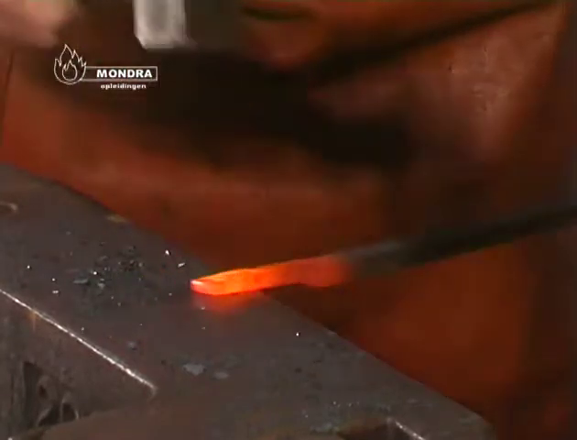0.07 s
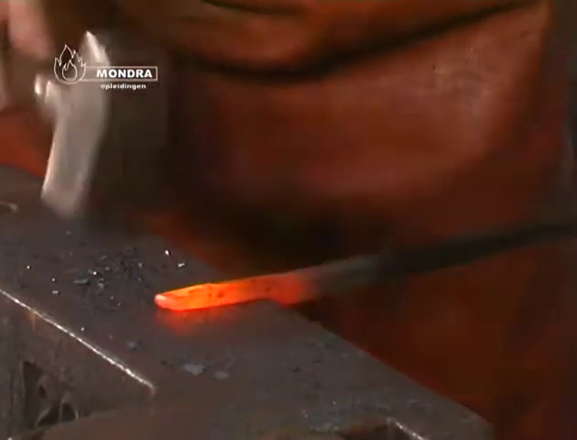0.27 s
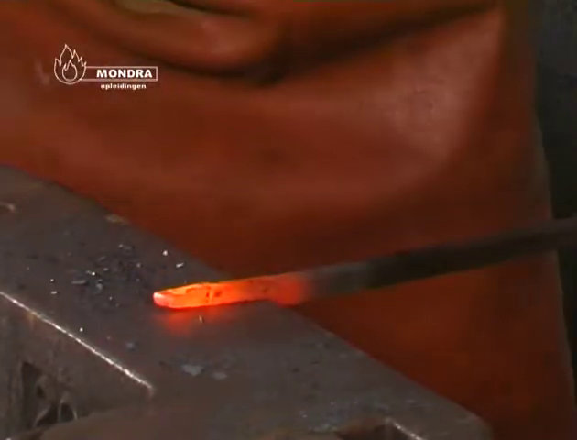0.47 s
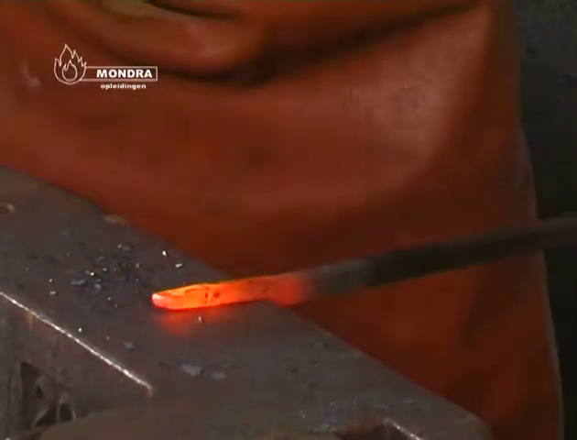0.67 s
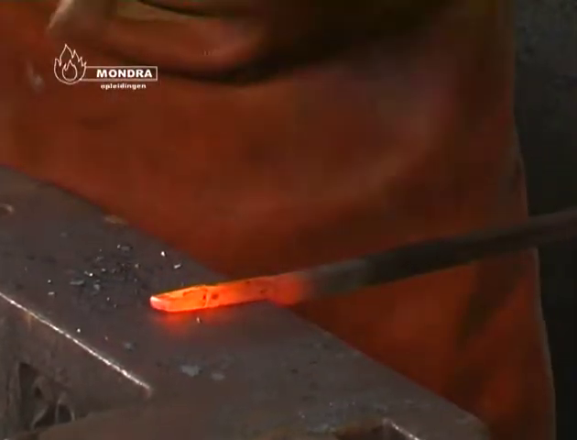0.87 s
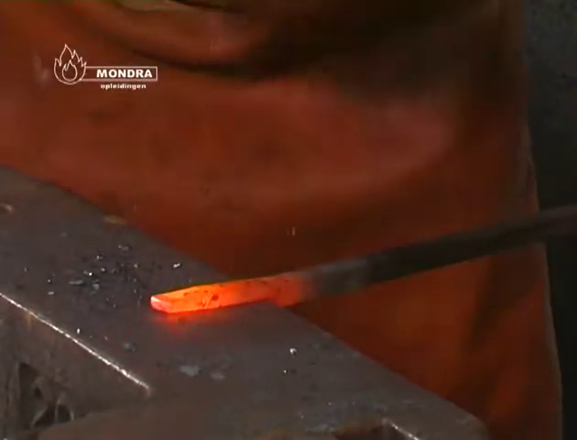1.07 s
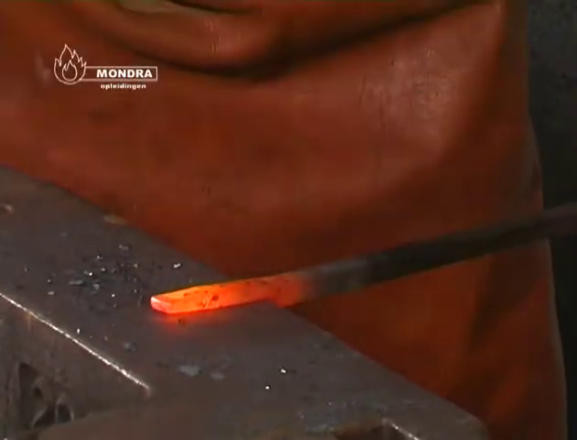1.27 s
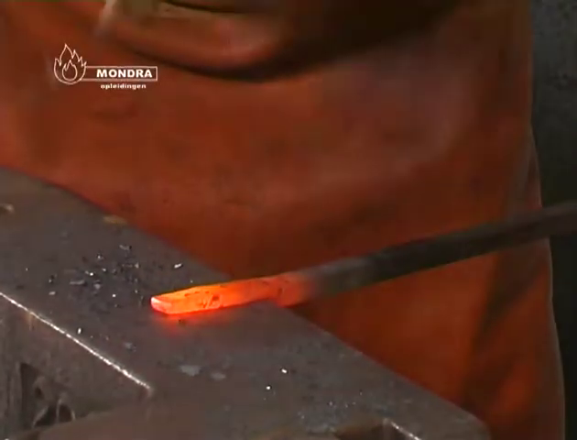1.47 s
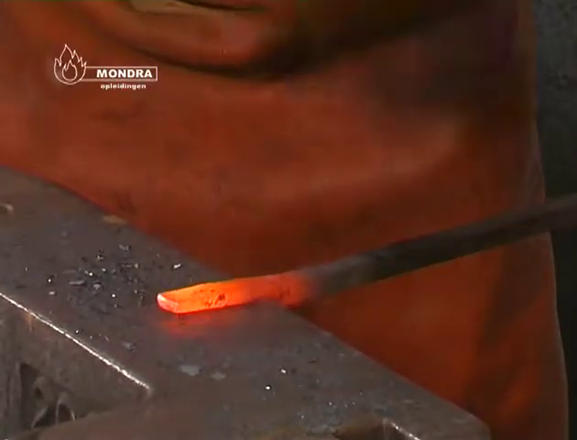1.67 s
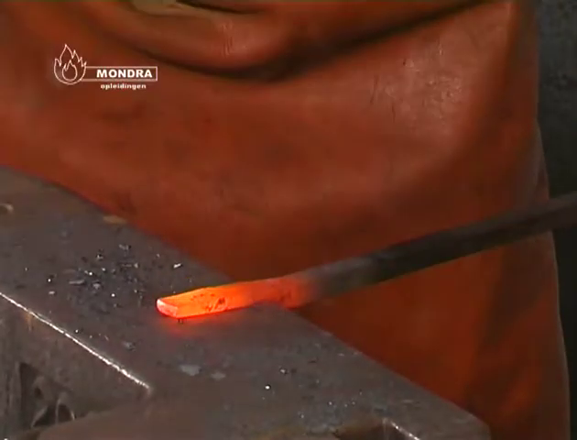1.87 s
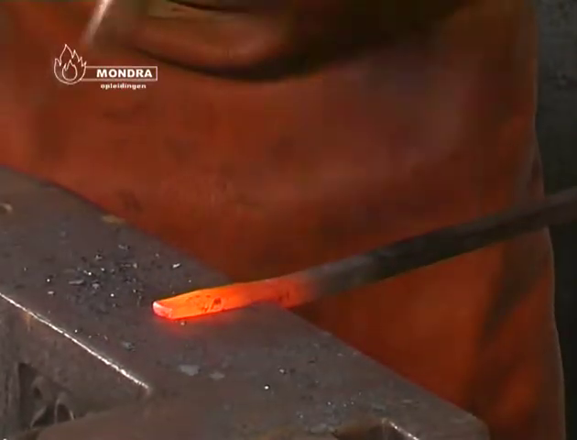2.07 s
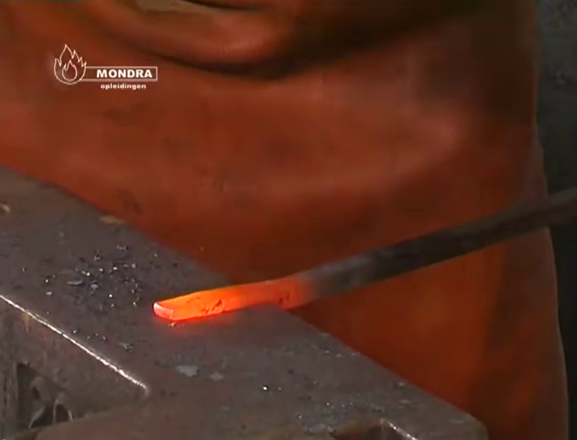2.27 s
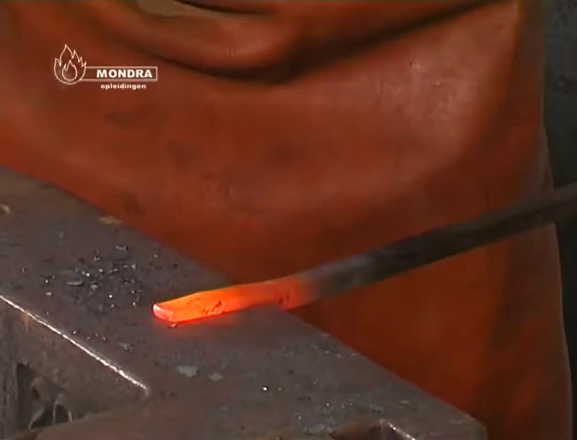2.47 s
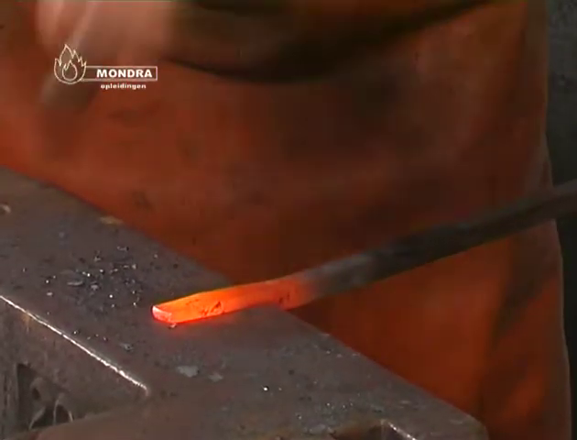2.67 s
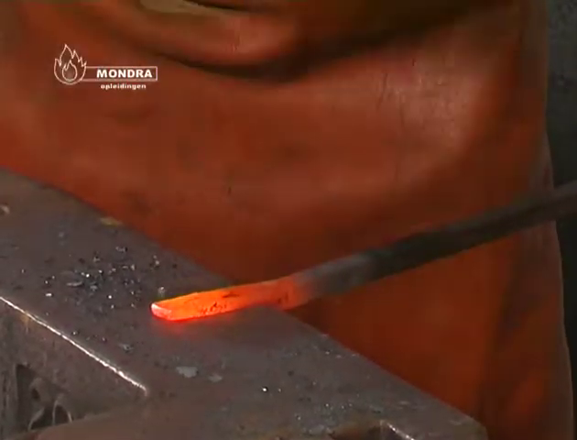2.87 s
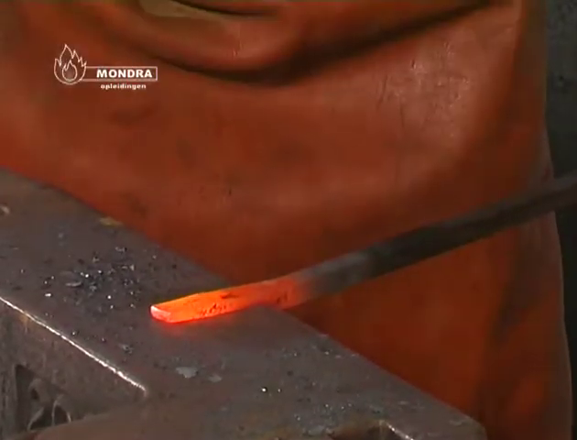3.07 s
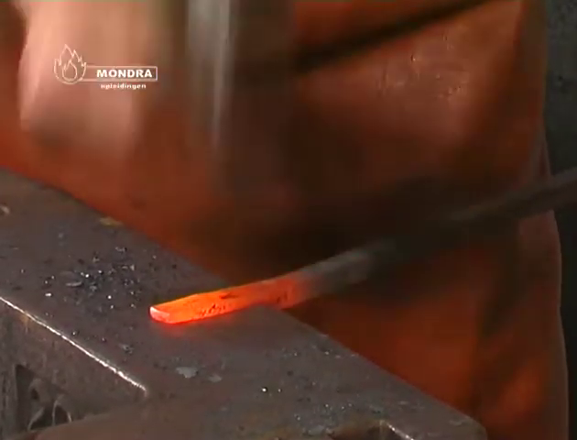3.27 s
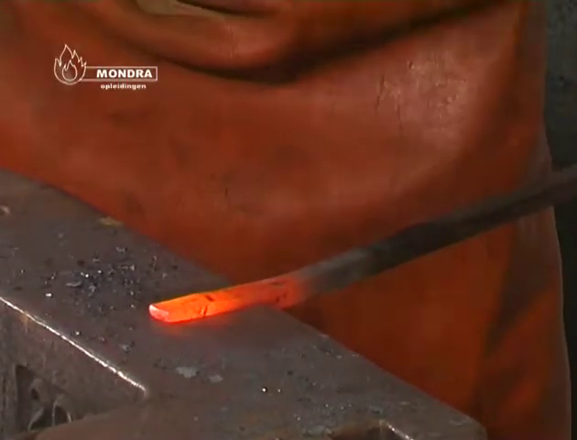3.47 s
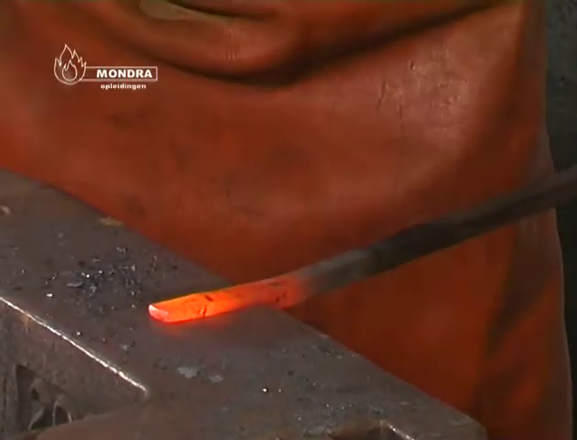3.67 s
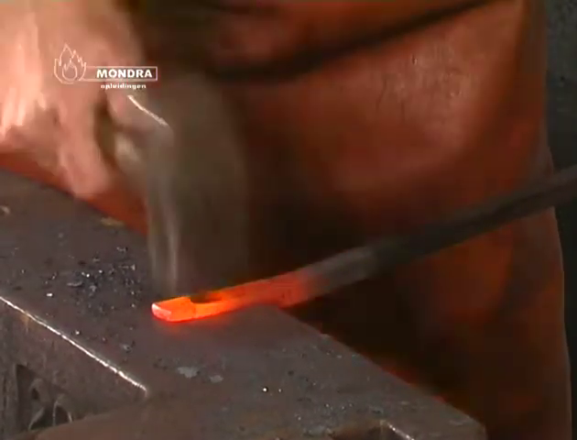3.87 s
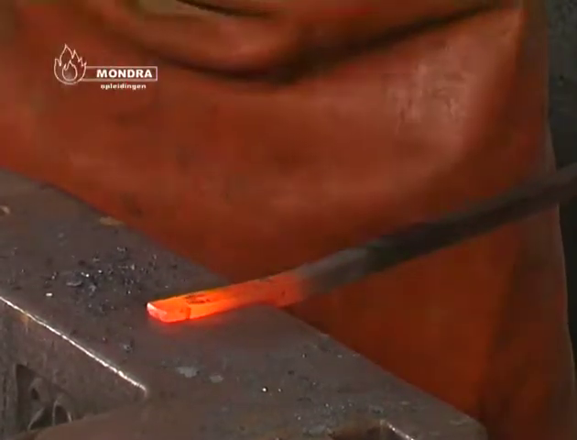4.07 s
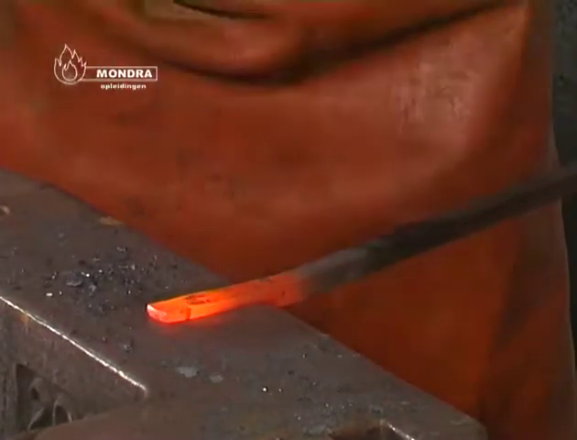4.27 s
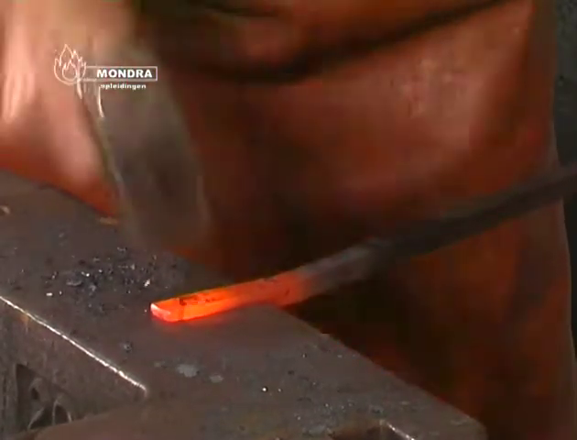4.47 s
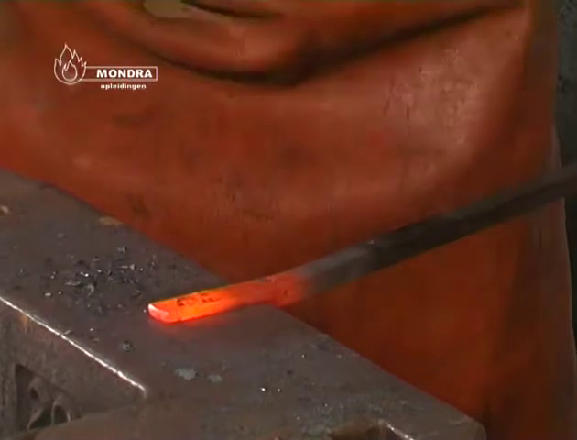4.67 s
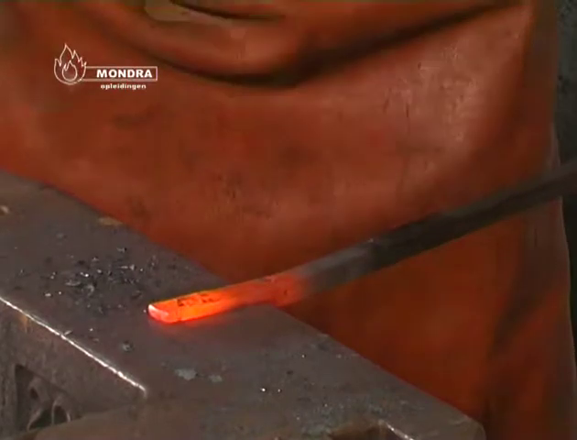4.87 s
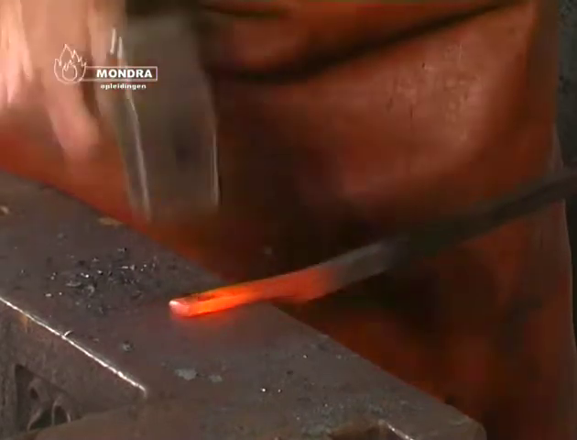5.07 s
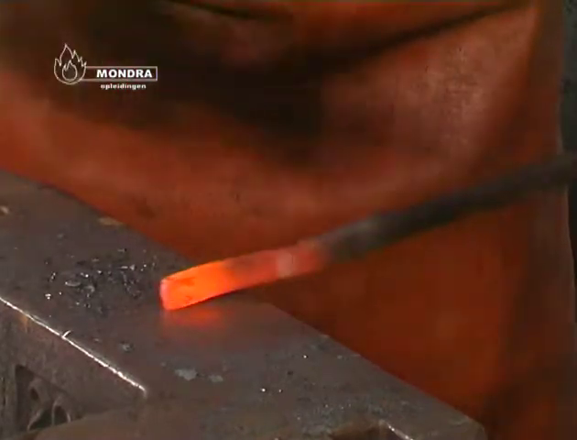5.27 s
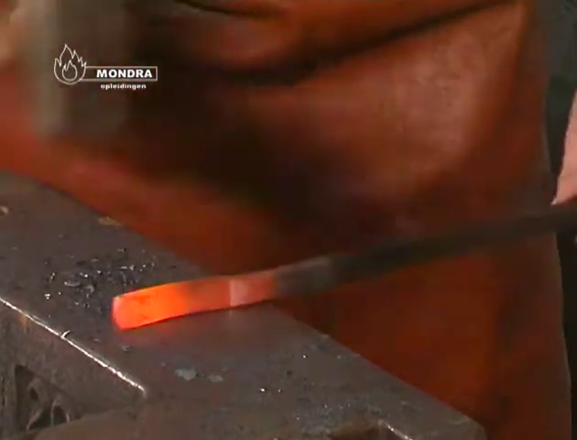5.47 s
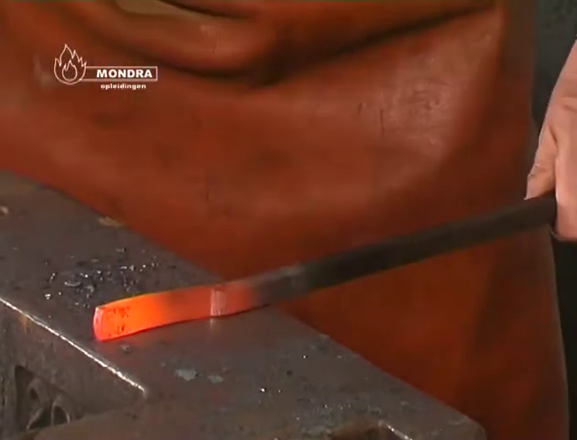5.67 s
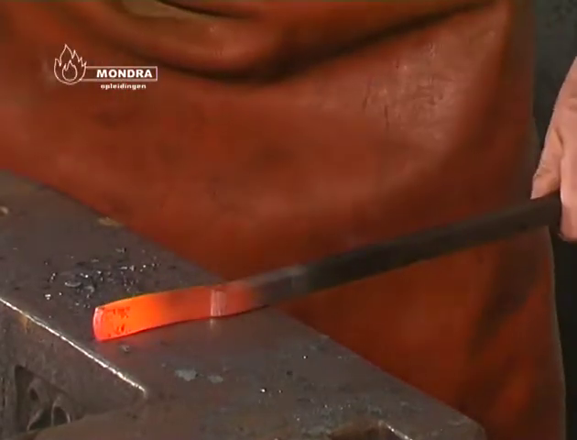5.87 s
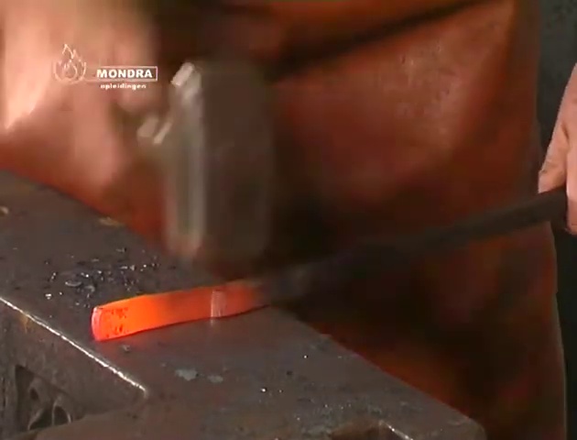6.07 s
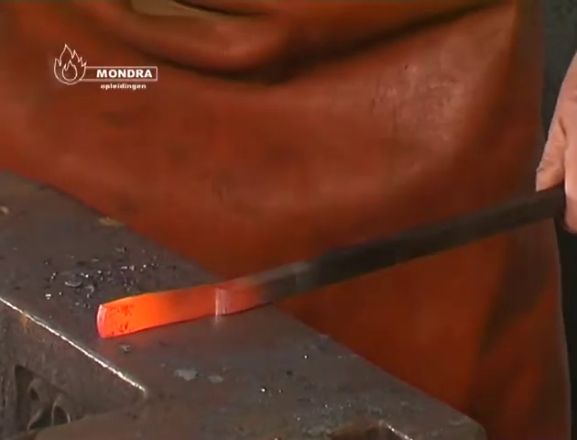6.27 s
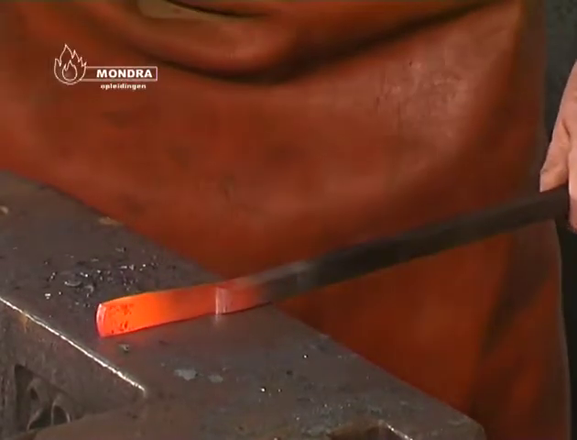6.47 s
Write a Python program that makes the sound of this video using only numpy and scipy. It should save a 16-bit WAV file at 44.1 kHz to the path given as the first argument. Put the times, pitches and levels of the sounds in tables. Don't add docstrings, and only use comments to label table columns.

```python
import sys
import numpy as np
from scipy import signal
from scipy.io import wavfile

SR = 44100
rng = np.random.default_rng(int(sys.argv[2]) if len(sys.argv) > 2 else 0)


def transcribe(signal):
    frames = np.atleast_2d(signal).T
    limited = np.clip(frames, -1, 1)
    pcm = np.round(limited * 32767).astype(np.int16)
    wavfile.write(sys.argv[1], SR, pcm)


def invert_db(x):
    u = np.asarray(x, float) / 20
    return 10 ** u


N = 287071
RUN_IN = SR // 2

# (t/s, crack level/dB, ring level/dB, place along the face [-1..1], place across [-1..1])
BLOWS = [
    (-.245, -15.5, -0.5, -1.15, -1.4),
    (0.9303, -12.5, 0, -0.34, 0.33),
    (1.5350, -14.5, -2.5, -0.37, -0.33),
    (2.1320, -13, -3, -0.27, 0.3),
    (2.7138, -13.5, -0.5, 0.38, 0.03),
    (3.293, -13.5, -1, 0.67, 0.25),
    (3.8630, -15, -1.5, 0.31, -0.44),
    (4.435, -15.5, -2.5, 0.4, -0.58),
    (5.0150, -14.5, -1.5, 0.84, -0.44),
    (6.0377, -20, -12, -0.95, -1.1),
]
# (t/s, crack level/dB, brightness/dB, heft/dB, body tone level/dB)
TAPS = [
    (0.2631, -15, -3.5, -1, -11.5),
    (5.404, -19, -31, -5, -21),
]


def at_hz(points, hz):
    table = np.array(points)
    return np.interp(np.log(hz), np.log(table[:, 0]), table[:, 1])


def by_place(per_unit_db):
    return np.clip(np.array(BLOWS)[:, 3:], -1, 1) @ per_unit_db


def clicks(times, db):
    out = np.full(N + RUN_IN, 1e-18)
    out[np.round(np.asarray(times) * SR).astype(int) + RUN_IN] = invert_db(db)
    return out


def ring(x, hz, t60):
    r = invert_db(-60 / (t60 * SR))
    w = 2 * np.pi * hz / SR
    return signal.lfilter([0, np.sin(w)], [1, -2 * r * np.cos(w), r * r], x)


def convolve(x, response):
    return signal.fftconvolve(x[None], response, axes=1)[:, :N + RUN_IN]


def stereo_bands(white, shape):
    # (f/Hz, likeness [0..1])
    likeness = [(80, 0.88), (160, 1), (350, 0.26), (700, 0.015), (1400, 0.58), (2800, 0.23), (5600, 0.58),
                (11000, 0.32)]
    # (f/Hz, level/dB)
    balance = [(60, 1.5), (180, -4), (550, -2), (1650, -3), (4970, -1.5), (15000, -6)]
    edges = 25 * 2 ** (np.arange(29) / 3)
    centres = np.sqrt(edges[1:] * edges[:-1])
    out = []
    for k, hz in enumerate(centres):
        sos = signal.butter(2, edges[k:k + 2], "band", fs=SR, output="sos")
        mid, side = signal.sosfilt(sos, white[k % 2] * shape(hz))
        alike = np.clip(at_hz(likeness, hz), 0, .99)
        pair = np.sqrt(1 + alike) * mid + np.sqrt(1 - alike) * side * [[1], [-1]]
        pair = pair * invert_db(at_hz(balance, hz) / 2 * np.array([[1], [-1]]))
        out.append(pair * np.sqrt(2 * hz / np.sum(pair ** 2)))
    return centres, np.array(out)


def coloured(bands, spectrum):
    centres, pairs = bands
    out = np.tensordot(invert_db(at_hz(spectrum, centres)), pairs, 1)
    return out / np.sqrt(np.sum(out ** 2) / 2)


def hall():
    # (f/Hz, t60/s)
    fading = [(60, 2.2), (250, 2.3), (700, 1.95), (1900, 1.95), (3500, 1.36), (5500, 0.97), (8000, 0.79),
              (13000, 0.65)]
    direct_db, direct_s = 11, 0.0021
    near_db, near_s = -7, .014
    early_db, early_s = 3, 0.14
    rise_cycles = 3.2
    t = np.arange(3 * SR // 2) / SR

    def shape(hz):
        near = invert_db(near_db) * np.exp(-t / near_s) * min(hz / 3000, 1)
        early = invert_db(early_db) * np.exp(-t / early_s)
        tail = invert_db(-60 * t / at_hz(fading, hz)) * (1 + near + early)
        build_up = 1 - np.exp(-t * hz / rise_cycles)
        return tail * build_up + invert_db(direct_db) * np.exp(-t / direct_s)

    return stereo_bands(rng.standard_normal((2, 2, len(t))), shape)


def air(bands):
    # (f/Hz, level/dB per Hz)
    air_colour = [(25, -11), (60, -2), (120, -4), (220, -4), (350, -24), (500, -16), (1100, -12),
                  (2500, -16), (5000, -8.5), (8000, -16.5), (11000, -47), (13500, -28), (16000, -39)]
    noise_db = -48.5
    hum_hz, hum_db, hum_width_hz = 221, -57, 3.6
    whine_hz, whine_db = 15622, -72
    length = N + RUN_IN
    noise = convolve(rng.standard_normal(length), coloured(bands, air_colour))
    hum = ring(rng.standard_normal(length), hum_hz, np.log(1000) / np.pi / hum_width_hz)
    whine = np.sqrt(2) * np.sin(2 * np.pi * whine_hz * np.arange(length) / SR)
    return invert_db(noise_db) * noise + invert_db(hum_db) * hum / hum.std() + invert_db(whine_db) * whine


def thud():
    # (f/Hz, level/dB, t60/s)
    floor_modes = [(57.75, -35, 1.83), (66.4, -33, 1.67), (164.5, -41, 0.6), (173.7, -43, 0.96)]
    lag_s = 0.02044
    struck = clicks(np.array(BLOWS)[:, 0] + lag_s, by_place((-1.9, 1)))
    struck += clicks(np.array(TAPS)[:, 0] + lag_s, -7)
    out = 0
    for k, (hz, db, t60) in enumerate(floor_modes):
        out = out + (-1) ** k * invert_db(db) * ring(struck, hz, t60)
    return out


def body():
    # (direct level/dB, echo arrival t/s,
    # level with echo/dB, sag/dB per s, held until t/s, release/dB per s)
    tone_course = [(-30, .064, -20.5, 27, .31, 150), (-27, .058, -24.5, 12, .22, 80)]
    tone_hz = 1430.7
    edge_s = 0.0017
    after_db, after_db_s = -34, 30
    lead_early, lead_late, lead_turn_s = -0.53, 1, 0.29
    late_share, late_s = .5, .2
    blows, taps = np.transpose(BLOWS), np.transpose(TAPS)
    t = np.arange(SR) / SR
    direct_db, echo_s, echo_db, sag, hold_s, release = np.transpose(tone_course)[:, :, None]
    joined = .5 + .5 * np.tanh((t - echo_s) / edge_s)
    level_db = direct_db + (echo_db - direct_db) * joined
    level_db = level_db - sag * (t - echo_s) - release * np.maximum(t - hold_s, 0)
    after_ring = joined * invert_db(after_db - after_db_s * t)
    height = np.hypot(invert_db(level_db), after_ring) * np.minimum(t / edge_s, 1)
    turned = .5 + .5 * np.tanh((t - lead_turn_s) / 0.01)
    lead = joined[0] * lead_early + (lead_late - lead_early) * turned
    phase = 2 * np.pi * tone_hz * t + lead * np.array([[.5], [-.5]])
    tone = np.sqrt(2) * height * np.sin(phase)
    s = np.r_[blows[0], taps[0]]
    db = np.r_[blows[2] + by_place((-3.0, 1.5)), taps[4]]
    late = .5 + .5 * np.tanh((t - late_s) / 0.026)
    early_part = convolve(clicks(s, db), tone * (1 - late))
    return early_part + convolve(clicks(s, late_share * db), tone * late)


def steel(room):
    # (f/Hz, level on the bar/dB,
    # first tap level/dB, second tap level/dB, t60/s)
    placed_modes = [(1196, -32, -26, -31, 0.6), (1701, -46, -31, -35, 0.57), (2220, -40, -47, -43, 0.98),
                    (2929, -27, -27, -30, 0.4), (3144, -44, -43, -32, 0.62), (3222, -41, -42, -36, 0.8),
                    (3300, -31, -37, -64, 0.5), (4171, -31, -35, -33, 0.95), (4472, -44, -35, -35, 0.4),
                    (4675, -33, -27, -24, 0.55),
                    (5170, -28, -31, -22, 0.7), (5258, -32, -31, -33, 1.12), (5640, -40, -39, -32, 0.33),
            (6050, -33, -45, -37, 0.4), (6083, -32, -30, -26, 0.48), (6789, -47, -40, -28, 0.26),
            (6939, -49, -53, -37, 0.32), (7408, -30, -56, -42, 0.41), (7617, -44, -58, -44, 0.34),
            (8108, -38, -72, -50, 0.34),
                    (8677, -37, -51, -47, 0.26), (9068, -38, -44, -54, 0.26), (10510, -44, -66, -59, 0.29),
            (10715, -52, -68, -51, 0.48), (10840, -48, -68, -62, 0.26), (11930, -46, -72, -64, 0.28),
            (12343, -40, -66, -66, 0.3), (13005, -49, -52, -57, 0.25), (13172, -37.5, -68, -63, 0.27),
            (14300, -57, -78, -78, 0.2)]
    face = [(7320, -50, -66, -58, .6), (7550, -46, -66, -56, .3), (7920, -48, -66, -60, .4),
            (8890, -56, -56, -58, .3), (9437, -53, -57, -58, .3), (9640, -56, -62, -62, .3),
            (10234, -53, -75, -72, .28), (11300, -60, -80, -72, .22), (11585, -60, -80, -66, .22),
            (12000, -48, -57, -66, .28), (12231, -51, -80, -80, .25), (13421, -55, -64, -78, .25),
            (13598, -51, -66, -74, .25), (14760, -62, -85, -85, .18)]
    # (dB per unit along, dB per unit across)
    place_shapes = [(-6, -6), (-2, -1), (-4, -2), (-2, 5), (-1, 1), (-6, 2), (-1, 4), (6, -1), (-2, -2),
                    (3, 1), (1, -2), (-6, 1), (1, -6), (-3, 4), (-4, 8), (-4, 1), (-7, -2), (3, -1),
                    (3, -5), (2, -4), (7, 0), (-1, 1), (4, 6), (4, -8), (0, 2), (11, 0), (7, 4), (-1, 4),
                    (4, 2), (-4, -7)]
    steel_db, wet_db, stretch = 2.2, -3, 0.9
    luck_db, spread_db = 1.2, 2.5
    modes = placed_modes + face
    shapes = place_shapes + [(0, 0)] * len(face)
    lucks = luck_db * rng.standard_normal((len(modes), len(BLOWS)))
    blow_s, ring_db = np.array(BLOWS)[:, 0], np.array(BLOWS)[:, 2]
    tap_s = np.array(TAPS)[:, 0]
    wet = invert_db(wet_db) * room
    path = wet.copy()
    path[:, 0] += 1
    t = np.arange(SR // 10) / SR
    rings, direct = 0, 0
    for (hz, db, first_db, second_db, t60), shape, luck in zip(modes, shapes, lucks):
        decay = t60 * stretch
        gathered = path[:, :len(t)] @ (invert_db(60 * t / decay) * np.exp(-2j * np.pi * hz * t))
        heard = np.sqrt(np.mean(np.abs(gathered) ** 2) + .5) / invert_db(60 * 0.072 / t60)
        struck = clicks(blow_s, db + ring_db + by_place(shape) + luck)
        struck += clicks(tap_s, [first_db, second_db])
        tone = ring(struck, hz, decay) / heard
        lean_db = spread_db * rng.standard_normal()
        rings = rings + tone
        direct = direct + invert_db([[lean_db], [-lean_db]]) * tone
    return invert_db(steel_db) * (direct + convolve(rings, wet))


def cracks(times, crack_db, brights_db, hefts_db, chatter_db):
    decay = np.exp(-np.arange(SR // 10) / SR / .016)
    chatter = rng.standard_normal((len(times), len(decay))) * decay
    chatter = signal.sosfilt(signal.butter(1, 900, "high", fs=SR, output="sos"), chatter)
    top = signal.butter(2, 6000, "high", fs=SR, output="sos")
    bottom = signal.butter(1, 1000, fs=SR, output="sos")
    out = np.zeros(N + RUN_IN)
    for s, db, bright_db, heft_db, own in zip(times, crack_db, brights_db, hefts_db, chatter):
        contact = invert_db(chatter_db) * own / np.sqrt(np.sum(own ** 2))
        contact[0] += 1
        contact += (invert_db(bright_db) - 1) * signal.sosfilt(top, contact)
        contact += (invert_db(heft_db) - 1) * signal.sosfilt(bottom, contact)
        at = round(s * SR) + RUN_IN
        out[at:at + len(contact)] += invert_db(db) * contact
    return out


def scene():
    # (f/Hz, level/dB per Hz)
    blow_colour = [(25, -32), (45, -13), (75, -25.5), (110, -10), (200, -21), (450, -35), (950, -21),
                   (1400, -11.5), (2200, -8.5), (3300, -8.5), (5000, -8), (7500, -19.5), (11000, -27),
                   (16000, -50)]
    # (f/Hz, level/dB per Hz)
    tap_colour = [(25, -22), (75, 1), (120, -3), (220, -5), (460, -43), (900, -14), (1600, 2.5),
                  (3000, 8.5), (5100, 1.5), (7000, -16), (8300, -40), (16000, -21)]
    bands = hall()
    even = coloured(bands, [(20, 0), (20000, 0)])
    s, crack_db = np.transpose(BLOWS)[:2]
    blow_cracks = cracks(s, crack_db, by_place((-4.2, -4)), by_place((-4, -3.2)), chatter_db=-3)
    tap_cracks = cracks(*np.transpose(TAPS)[:4], chatter_db=-14)
    blows = invert_db(34.5) * convolve(blow_cracks, coloured(bands, blow_colour))
    taps = invert_db(33) * convolve(tap_cracks, coloured(bands, tap_colour))
    return (air(bands) + thud() + body() + steel(even) + blows + taps)[:, RUN_IN:]


def top_cut(x):
    return signal.sosfilt(signal.butter(12, 16580, fs=SR, output="sos"), x)


def record(dry):
    knee_db, release_db_s, squeeze, attack_s = -5.5, 150, .55, 0.004
    lean_db = 0.5
    fall = release_db_s * np.arange(N) / SR
    level_db = 20 * np.log10(np.abs(dry).max(0) + 1e-6)
    held_db = np.maximum.accumulate(level_db + fall) - fall
    over_db = np.maximum(held_db - knee_db, 0)
    r = np.exp(-1 / (attack_s * SR))
    duck_db = squeeze * signal.lfilter([1 - r], [1, -r], over_db)
    ducked = dry * invert_db([[lean_db], [-lean_db]]) * invert_db(-duck_db)
    rounded = .75 * np.tanh(ducked / .75)
    mix = signal.sosfilt(signal.cheby2(10, 60, 16900, fs=SR, output="sos"), rounded)
    return top_cut(mix)


dry = scene()
out = record(dry)
transcribe(out)
```